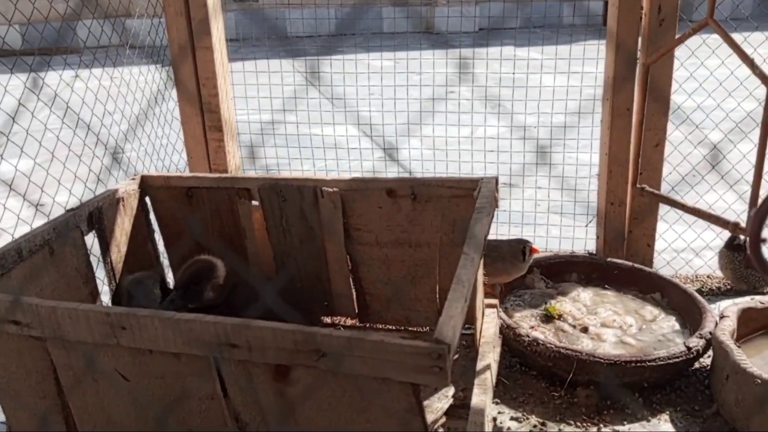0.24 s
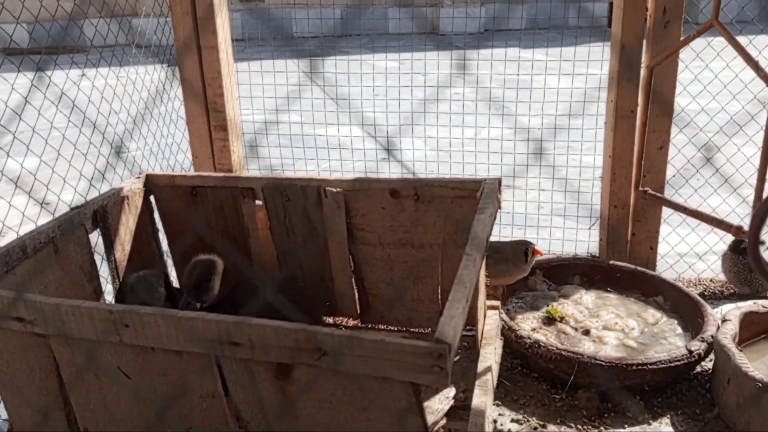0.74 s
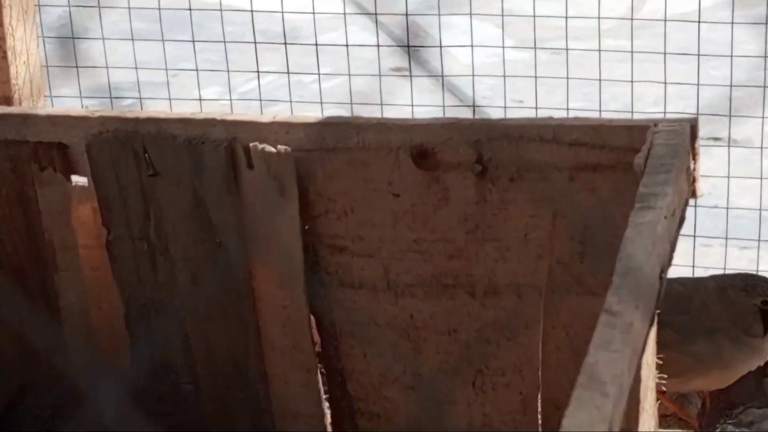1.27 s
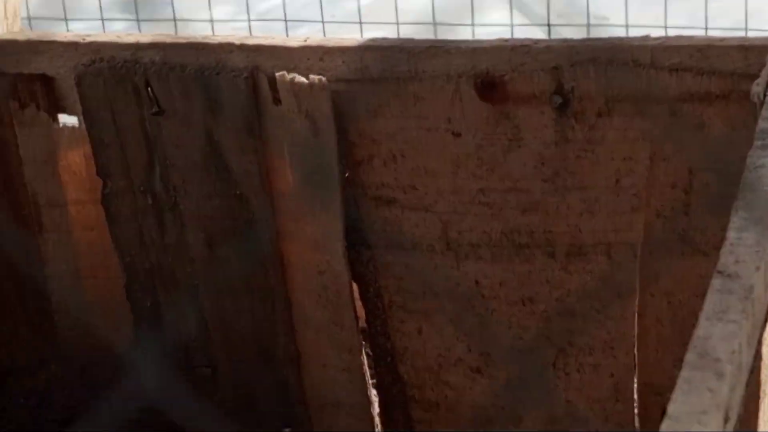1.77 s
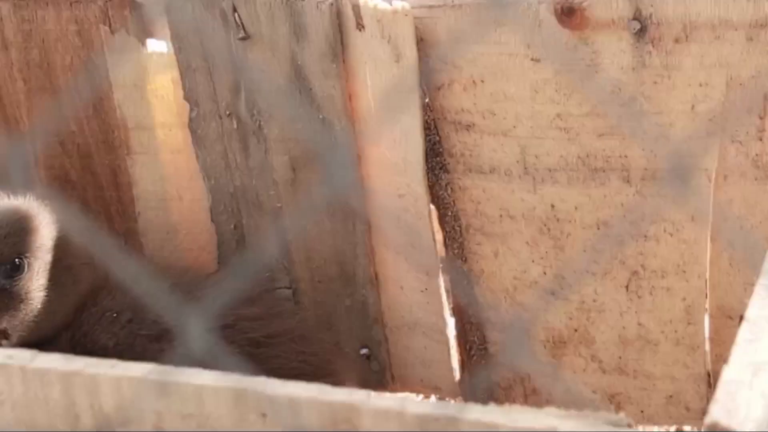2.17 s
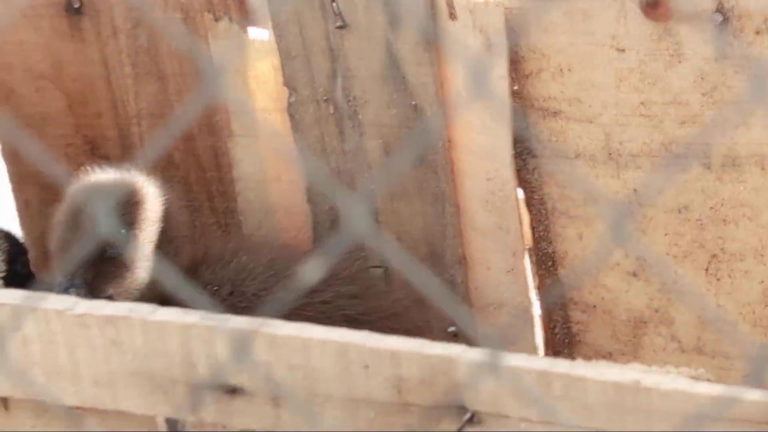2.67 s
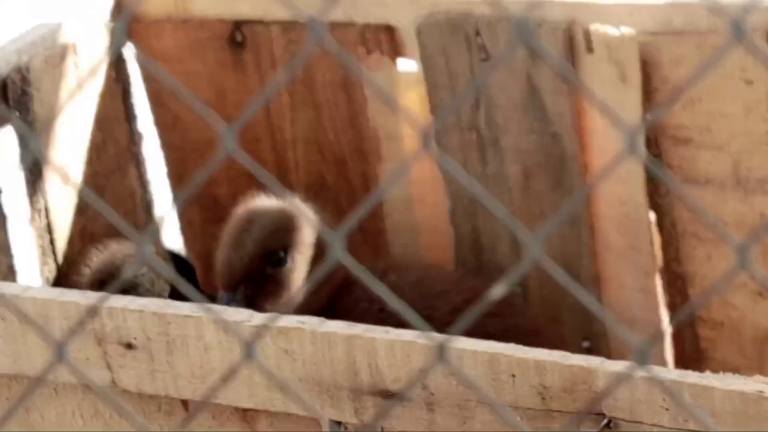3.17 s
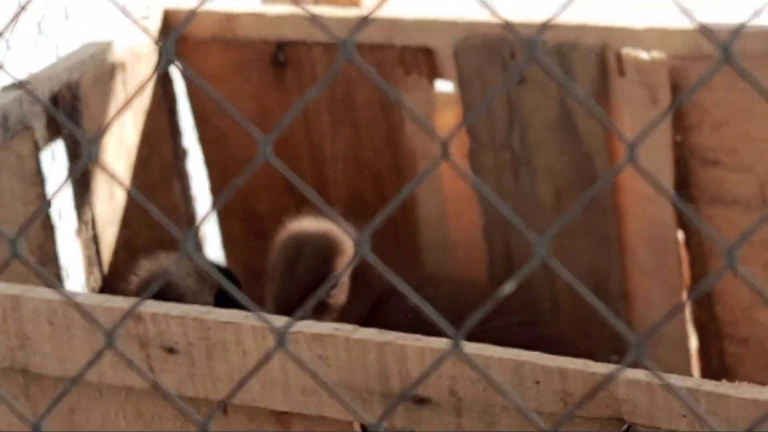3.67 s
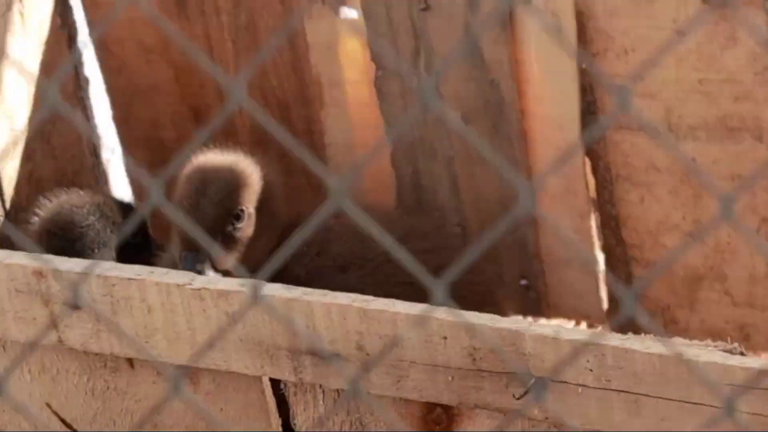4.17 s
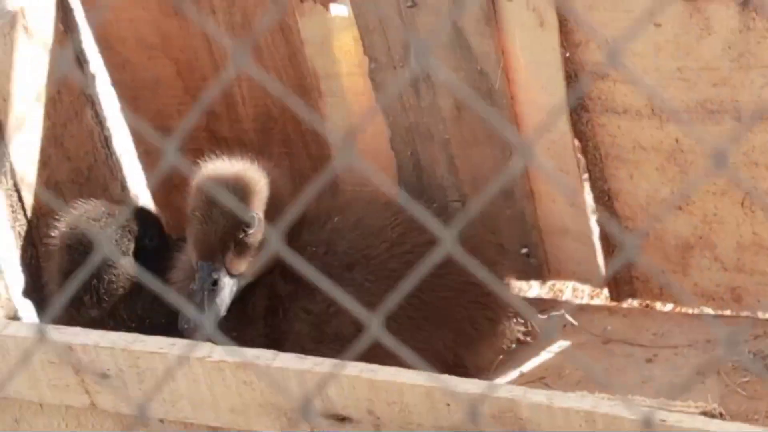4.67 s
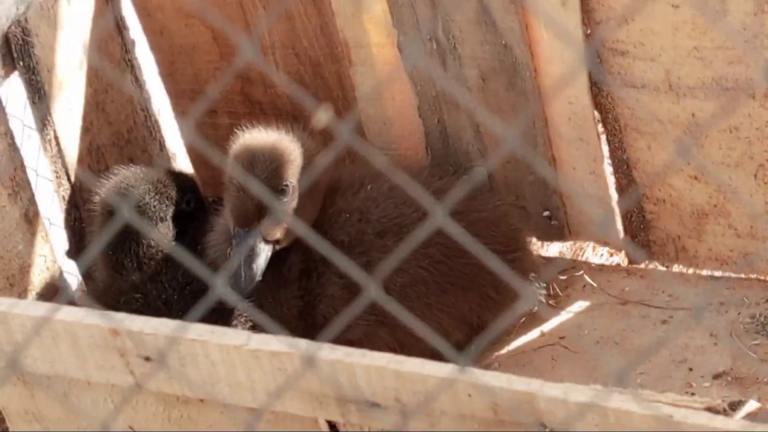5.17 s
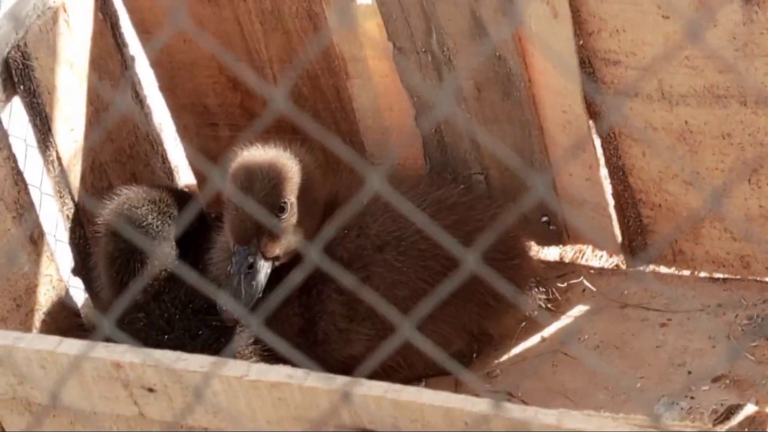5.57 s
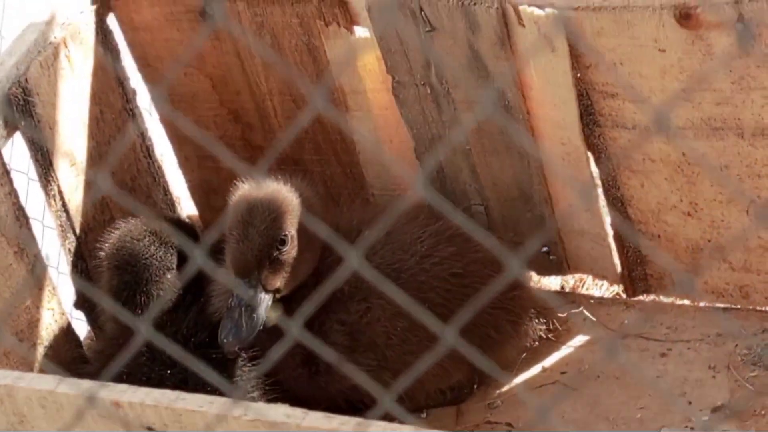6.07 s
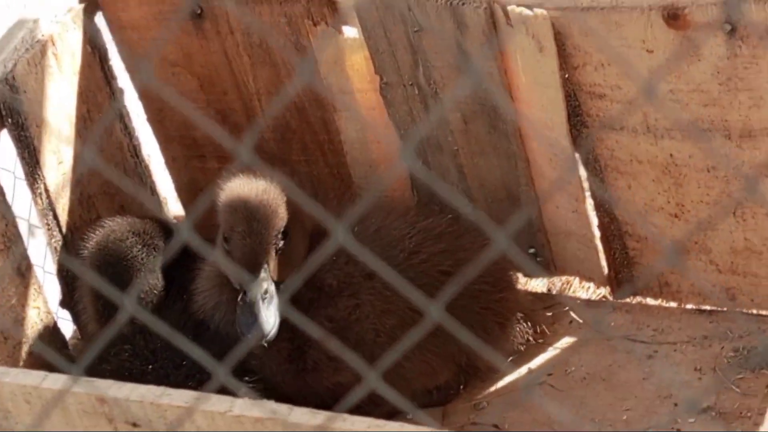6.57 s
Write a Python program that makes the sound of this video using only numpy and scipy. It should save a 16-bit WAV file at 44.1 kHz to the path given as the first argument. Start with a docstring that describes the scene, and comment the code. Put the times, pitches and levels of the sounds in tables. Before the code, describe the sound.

Outdoors by a boarded poultry pen, a close hen gives short, mostly falling clucks two or three times a second. Small birds chirp thinly with reverberation, and ducklings peep in pairs. Litter rustles and wire rattles; a distant rooster crows in two phrases from about two to three seconds, as the handheld microphone gets bumped.

```python
"""Poultry in a wooden pen

A hen close by gives short clucks that mostly fall in pitch; ducklings whistle thin, arching peeps.
Small birds chirp, a finch buzzes once and a rooster crows far off. Voices are sine tones and shaped noise.
Knocks burst and ring in boards and wire; litter rustles as many tiny ringing contacts.
The microphone rumbles when bumped. Air noise, echoes and reverberation lie around it all."""
import sys
import numpy as np
from scipy import signal
from scipy.fft import rfft, irfft
from scipy.io import wavfile

SR = 44100
rng = np.random.default_rng(int(sys.argv[2]) if len(sys.argv) > 2 else 0)


def transcribe(signal):
    """Save signal, clipped to [-1, 1], as a 16-bit WAV file at the path in sys.argv[1]."""
    frames = np.atleast_2d(signal).T
    limited = np.clip(frames, -1, 1)
    pcm = np.round(limited * 32767).astype(np.int16)
    wavfile.write(sys.argv[1], SR, pcm)


N = 300762  # length in samples
TIME = np.arange(N) / SR


def from_db(db):
    """Turn decibels into a plain multiplier."""
    return 10 ** (np.asarray(db) / 20)


def rms_one(x):
    """Scale x to an average (rms) strength of 1."""
    return x / np.sqrt(np.mean(x ** 2) + 1e-20)


def in_time(rows):
    """Each column of a curve at every sample; the first column is time in seconds."""
    s, *columns = np.transpose(rows)
    return [np.interp(TIME, s, c) for c in columns]


def gain_at(points, hz):
    """Gain of a spectrum at these frequencies."""
    f, db = np.transpose(points)
    return from_db(np.interp(np.log(hz + 1), np.log(f), db))


def colour(x, spectrum):
    """Give x a spectrum that falls away beyond its ends; rms 1."""
    hz = np.arange(len(x) // 2 + 1) * SR / len(x) + 1
    low_skirt = np.minimum(1, hz / spectrum[0][0]) ** 2
    high_skirt = np.minimum(1, spectrum[-1][0] / hz) ** 2
    return rms_one(irfft(rfft(x) * gain_at(spectrum, hz) * low_skirt * high_skirt, len(x)))


def drift(rate, size):
    """Random wobble around zero: `rate` new values a second, joined by straight lines."""
    at = np.arange(size) * rate / SR
    count = int(at[-1]) + 2
    return np.interp(at, np.arange(count), rng.standard_normal(count))


def add(out, s, x):
    """Mix x into out from time s, in seconds."""
    i = round(s * SR)
    x, i = x[max(-i, 0):], max(i, 0)
    out[i:i + len(x)] += x[:max(N - i, 0)]


def phase_of(hz):
    """Add up a changing pitch into the phase of its wave."""
    return 2 * np.pi * np.cumsum(hz) / SR


def reedy(hz, throat, count):
    """Harmonics of a pitch, each weighted by the throat's resonances; rms 1."""
    phase = phase_of(hz)
    return rms_one(sum(gain_at(throat, k * hz) * np.sin(k * phase) for k in range(1, count + 1)))


def stroke(s, length, attack_s, fall_db_per_s):
    """Envelope of one contact: a rise up to time s, a hold, a steady fall."""
    rise = np.clip(1 + (TIME - s) / attack_s, 0, 1) ** 2
    return rise * from_db(-np.clip(fall_db_per_s * (TIME - s - length), 0, 200))


def grains(low_hz, high_hz, per_s, ring_s, spread_db, count):
    """Tiny contacts of uneven size, each ringing briefly at one of `count` pitches; rms 1."""
    out, r = np.zeros(N), from_db(-60 / (ring_s * SR))  # r: strength kept from sample to sample
    born = rng.random(N) < per_s * from_db(4 * drift(70, N)) / SR
    sizes = from_db(spread_db * np.minimum(rng.exponential(1, N), 3))
    clicks = born * sizes * rng.choice([-1, 1], N)
    dealt = rng.integers(0, count, N)  # which pitch each contact gets
    for k, hz in enumerate(np.geomspace(low_hz, high_hz, count)):
        w = 2 * np.pi * hz / SR
        resonator = [1, -2 * r * np.cos(w), r * r]
        out += signal.lfilter([1, 0, -1], resonator, clicks * (dealt == k) + 1e-18)
    return rms_one(out)


def outdoor_air(level_db=-56.5):
    """A faint, steady bed of coloured noise."""
    # Spectrum of the air noise. Each row: frequency in Hz, gain in dB.
    air_spectrum = [(40, -18), (90, 14.5), (200, 4), (450, 3), (900, -24.5), (1800, 4.5), (4000, -12),
                    (6800, -20.5), (11000, -28), (15000, -14.5)]
    return from_db(level_db) * colour(rng.standard_normal(N), air_spectrum)


def handling(level_db=-3.5, attack_s=0.018, fall_db_per_s=202.5, grip_db=-59.5):
    """The microphone's body rumbles with each bump, and faintly throughout from the hand's grip."""
    # Bumps on the microphone. Each row: time of full force in seconds, hold in seconds,
    # rumble in dB before the overall level.
    bumps = [(2.38, 0.17, -25.5), (2.6, 0.055, -37), (2.907, 0.055, -46), (3.76, .1, -45),
             (4.107, 0.028, -41.5), (4.35, 0.021, -40.5), (4.897, 0.028, -36)]
    # Spectrum of the rumble. Each row: frequency in Hz, gain in dB.
    rumble = [(25, -15.5), (45, -15.5), (62, -7.5), (76, 1.5), (95, -7.5), (113, 0.5), (160, -6.5),
              (300, -17)]
    force = from_db(grip_db)
    for s, length, db in bumps:
        force = force + from_db(db) * stroke(s, length, attack_s, fall_db_per_s)
    return from_db(level_db) * force * colour(rng.standard_normal(N), rumble)


def rustling(scuff_db=1, rattle_db=-1.5, rub_db=-5, attack_s=0.011, fall_db_per_s=338.5):
    """Litter scuffs dully while seed and wire rattle brightly, over a soft rubbing noise."""
    # The birds' constant stirring between scratches. Each row: time in seconds, relative level in dB.
    stir = [(0, -43.5), (1.1, -51), (1.7, -44.5), (3.1, -45.5), (4.3, -51), (6.8, -52.5)]
    # Scratches in the litter, which also shake seed and wire. Each row: time of full force in seconds,
    # hold in seconds, relative dull scuffing in dB, relative bright rattle in dB.
    scratches = [ (0, 0.039, -29, -31), (0.121, 0.0088, -37, -46), (0.237, 0.054, -38, -51),
                 (0.527, .012, -40, -31), (0.546, 0.039, -24.5, -28), (0.647, 0.036, -29.5, -40.5),
                 (0.863, 0.037, -40, -50), (1.462, 0.063, -41, -36.5), (1.513, .05, -30, -42.5),
                 (1.576, 0.056, -23.5, -42.5), (1.657, 0.056, -27, -39.5), (1.973, 0.021, -44, -33),
                 (2.332, 0.058, -38, -44), (2.394, .21, -26.5, -32), (2.615, 0.083, -31.5, -35.5),
                 (2.8, 0.092, -39, -37.5), (2.909, 0.062, -33, -30.5), (3.281, 0.042, -34, -38),
                 (3.468, .045, -42.5, -46), (3.571, 0.022, -33.5, -45), (3.777, 0.013, -43, -47.5),
                 (3.882, 0.014, -45, -40), (3.977, 0.013, -40.5, -24.5), (4.037, 0.0048, -53, -32.5),
                 (4.62, 0.005, -41, -39.5), (4.856, 0.058, -35.5, -43), (4.984, 0.0039, -43.5, -40),
                 (5.089, 0.0059, -51, -30), (5.212, 0.013, -51, -42), (6.029, 0.038, -44, -45),
                 (6.403, 0.012, -59, -43.5), (6.679, 0.012, -53, -51)]
    # Spectrum of the dull scuffing. Each row: frequency in Hz, gain in dB.
    scuff = [(250, -8.5), (350, -11.5), (700, -6), (1300, 0), (2200, 1), (3200, 3), (4800, -1.5),
             (6500, -39.5)]
    # Spectrum of the bright rattle. Each row: frequency in Hz, gain in dB.
    rattle = [(2000, -28), (3200, -5.5), (4600, -6), (5800, 3.5), (7500, -3.5), (9500, -11), (13000, -30.5),
              (15500, -9.5)]
    dull = from_db(in_time(stir)[0] + 3 * drift(16, N))  # the stirring flickers
    bright = dull * from_db(-8.5)
    for s, length, dull_db, bright_db in scratches:
        push = stroke(s, length, attack_s, fall_db_per_s)
        dull = np.maximum(dull, from_db(dull_db) * push)
        bright = np.maximum(bright, from_db(bright_db) * push)
    rub = from_db(rub_db) * rng.standard_normal(N)
    litter = grains(280.4, 5500, per_s=3500, ring_s=0.061, spread_db=7.3, count=44) + rub
    seed = grains(2600, 15500, per_s=2400, ring_s=0.028, spread_db=4.8, count=48) + rub
    scuffing = from_db(scuff_db) * dull * colour(litter, scuff)
    rattling = from_db(rattle_db) * bright * colour(seed, rattle)
    return scuffing + rattling


def rooster():
    """A hoarse crow in two phrases: harmonics through a throat, each phrase rising then sagging in pitch."""
    # The crow over time. Each row: time in seconds, pitch in Hz, relative level in dB,
    # hoarseness as a share of the pitch.
    crow = [(1.62, 413.3, -43.5, 0.011), (1.95, 506, -30.5, 0.015), (2.17, 475.4, -29, 0.044),
            (2.3, 438.3, -39.5, 0.05), (2.37, 434.4, -55, 0.024), (2.55, 463.4, -32, 0.015),
            (2.8, 466.3, -34.5, 0.013), (3.23, 399.6, -41, 0.019), (3.3, 396, -66, 0.051)]
    # Resonances of the throat. Each row: frequency in Hz, gain in dB.
    crow_throat = [(400, -25), (900, -1), (1180, -30.5), (1390, -1), (1500, -13.5), (1650, 12), (1950, 1),
                   (2300, -24.5), (2900, -22), (3300, -7.5), (4500, -80)]
    hz, level_db, hoarse = in_time(crow)
    sounding = (TIME > crow[0][0]) & (TIME < crow[-1][0])
    loudness = sounding * from_db(level_db + 4.2 * drift(25.07, N))
    return loudness * reedy(hz * (1 + hoarse * drift(350, N)), crow_throat, count=8)


def small_birds(trill=0.042, trill_rate=450, scoop=0.1, scoop_s=.012, low_voice=0.87, low_voice_db=-6):
    """Shivering slurs flick up, then mostly fall; two sides of the syrinx (voice box) differ in pitch."""
    # Chirps. Each row: start in seconds, length in seconds, pitch in Hz that the opening upward flick
    # aims for, end pitch in Hz, relative level in dB.
    slurs = [ (.005, 0.16, 4870, 3690, -34), (0.084, 0.1, 5170, 3630, -31), (0.777, 0.075, 5020, 3630, -39),
             (1.385, 0.058, 5080, 4220, -38.5), (1.538, 0.055, 3195, 2430, -26),
             (1.871, 0.13, 5210, 2596, -26.5), (3.184, 0.13, 5520, 4210, -32),
             (3.459, 0.068, 4120, 2946, -34), (3.675, 0.13, 5335, 3433, -31.5),
             (4.434, 0.048, 5560, 4800, -22), (4.475, 0.098, 4694, 3415, -28.5),
             (4.901, 0.17, 5590, 3830, -30), (5.066, 0.05, 3520, 2704, -32.5),
             (5.261, 0.11, 5420, 3630, -32), (5.777, 0.077, 5480, 3810, -34),
             (6.353, 0.039, 4880, 4890, -35), (6.448, 0.088, 3760, 2534, -39.5),
             (6.476, 0.061, 4740, 4530, -38.5)]
    out = np.zeros(N)
    for s, length, aim_hz, end_hz, level_db in slurs:
        size = int(length * SR)
        flick = 1 - scoop * np.exp(-np.arange(size) / SR / scoop_s)
        hz = np.linspace(aim_hz, end_hz, size) * flick
        for ratio, side_db in [(1, 0), (low_voice, low_voice_db)]:
            voice = np.sin(phase_of(ratio * hz * (1 + trill * drift(trill_rate, size))))
            loudness = from_db(level_db + side_db + 3.9 * drift(150, size))
            add(out, s, loudness * signal.windows.tukey(size, .4) * voice)
    return out


def finch(arch=0.058):
    """A short, nasal, buzzy note: many harmonics through a throat, with pitch and loudness arching."""
    # Notes. Each row: start in seconds, length in seconds, top pitch in Hz, relative level in dB.
    notes = [(4.871, 0.058, 573, -26.5)]
    # Resonances of the throat. Each row: frequency in Hz, gain in dB.
    finch_throat = [(500, -52), (1700, -4.5), (2400, -3.5), (3600, 8), (4600, -1.5), (7000, -4.5),
                    (9000, -58)]
    out = np.zeros(N)
    for s, length, hz, level_db in notes:
        bow = np.sin(np.linspace(0, np.pi, int(length * SR)))
        note = reedy(hz * (1 + arch * (bow - 1)), finch_throat, count=14)
        add(out, s, from_db(level_db) * bow * note)
    return out


def ducklings(waver=0.016, flutter_db=4, sag_db=5.5, octave_db=-30):
    """Thin, nearly pure whistles that arch up and weaken as they come down again."""
    # Peeps. Each row: time of the top in seconds, length in seconds, lowest pitch in Hz,
    # top pitch in Hz, relative level in dB.
    whistles = [ (0.384, 0.11, 2147, 3990, -31.5), (0.497, 0.12, 2114, 3830, -28.5),
                (3.231, 0.084, 2200, 3710, -37.5), (3.353, .110, 1935, 3900, -38),
                (5.873, 0.078, 1776, 2253, -36.5), (6.631, 0.082, 1920, 3070, -37.5),
                (6.736, 0.08, 1900, 3186, -35)]
    # Resonances of the throat. Each row: frequency in Hz, gain in dB.
    peep_throat = [(1700, -37), (2100, 3), (2450, 10.5), (2750, -2), (3100, 7), (3500, 1.5), (3900, 11),
                   (4600, -20)]
    out = np.zeros(N)
    for s, length, foot_hz, top_hz, level_db in whistles:
        u = np.linspace(-1, 1, int(length * SR))
        hz = foot_hz + (top_hz - foot_hz) * np.cos(np.pi * u / 2) ** 2
        hz = hz * (1 + waver * drift(400, len(u)))
        loudness = from_db(level_db - sag_db * u + flutter_db * drift(120, len(u)))
        loudness = loudness * signal.windows.tukey(len(u), .14)
        phase = phase_of(hz)
        tone = gain_at(peep_throat, hz) * np.sin(phase) + from_db(octave_db) * np.sin(2 * phase)
        add(out, s - length / 2, loudness * tone)
    return out


def knocks(crack_s=0.0053, thud_s=0.0064, body_db=-4, wire_db=-9):
    """Each knock cracks in the frame, thuds in the boards and sets the wires ringing."""
    # Sharp knocks on the pen. Each row: start in seconds, overall level in dB, then the relative
    # levels in dB of the crack, the wire ring and the wooden thud.
    hits = [(0.1331, 0.5, -2.5, -5, -16), (1.4693, -9, -17, -30, 0), (1.6527, 7.5, -23, 1, -19.5),
            (2.385, -1.5, 0, -55, -24), (2.4182, -0.5, -3.5, -28, -36), (2.5177, -3, -6.5, -0.5, -24),
            (2.9533, -6.5, -15, 2, -16), (2.976, -20, -16, -2, -25), (2.998, -7.5, -19, -3.5, -19)]
    # Spectrum of the crack in the frame. Each row: frequency in Hz, gain in dB.
    frame = [(300, -17.5), (800, 4.5), (1300, -14), (2200, -2.5), (3100, 8), (4500, -4.5), (6000, -5),
             (9500, -22), (13000, -39), (16000, -43)]
    # Spectrum of the thud in the boards. Each row: frequency in Hz, gain in dB.
    board = [(200, -39.5), (380, 2.5), (620, 1), (900, 6.5), (1800, -13.5), (3000, -16)]
    # Notes of the wire mesh. Each row: frequency in Hz, relative level in dB,
    # time to fade by 60 dB in seconds.
    wires = [(3570, -23, .07), (4700, -6.5, 0.073), (5694, -18.5, 0.037), (5905, 22, 0.029),
             (6450, 6.5, 0.083), (7180, 1.5, .06), (8440, -3, 0.11), (9400, -12.5, .08)]
    out, t = np.zeros(N), np.arange(SR // 5) / SR
    for s, peak_db, crack_db, ring_db, thud_db in hits:
        crack = colour(rng.standard_normal(len(t)), frame) * np.exp(-t / crack_s)
        thud = colour(rng.standard_normal(len(t)), board) * np.exp(-t / thud_s)
        ring = np.zeros(len(t))
        for hz, db, t60 in wires:
            # every knock excites each wire note a little differently
            ring += from_db(db - 60 * t / t60 + rng.normal(0, 4)) * np.sin(2 * np.pi * hz * t)
        body = from_db(crack_db + body_db) * crack + from_db(thud_db + body_db) * thud
        wire_ring = from_db(ring_db + wire_db) * ring / np.abs(ring).max()
        add(out, s, from_db(peak_db) * (body + wire_ring))
    return out


def hen(break_s=0.0027, second_db=-17, third_db=-34, jitter=0.051, attack_s=0.0028, release_s=0.005,
        lead_s=0.011, gulp_at_s=0.0086, gulp_s=0.0074, gulp_db=-7.5):
    """A faint lead-in, a push of air whose pitch breaks, usually down, and a gulp as the throat shuts.

    Returns the direct sound and what goes out into the pen, a share that falls steadily
    as the microphone moves into the box."""
    # Clucks. Each row: time of the pitch break in seconds, pitch before in Hz, pitch after in Hz,
    # level in dB, swell before the break in seconds, fade after it in seconds,
    # relative rasp in dB, relative lead-in in dB, gulp pitch in Hz.
    calls = [ (.001, 480, 437, -14.5, 0.0038, 0.013, -11, -14.5, 340),
             (0.338, 560, 394, -4.5, 0.0012, 0.011, -9.5, -21, 340),
             (0.612, 900, 701, -4, 0.0023, .012, -11.5, -19, 482),
             (0.904, 470, 396, -10.5, 0.0013, 0.017, -25.5, -29, 330),
             (1.034, 420.5, 436, -3, .001, 0.0072, -26, -35, 370),
             (1.321, 660, 595, -10.5, 0.01, 0.012, -14.5, -31, 517),
             (1.534, 700, 625, -4.5, 0.006, 0.015, -12.5, -10.5, 325),
             (1.784, 1170, 649, -9.5, 0.0041, 0.017, -7.5, -12.5, 344),
             (2.098, 490, 421, -11, 0.005, 0.011, -14, -31, 404),
             (2.402, 620, 444, -10.5, 0.00068, 0.018, -6, -44, 405),
             (3.314, 680, 470, -12, 0.0095, 0.016, -12, -24, 406),
             (3.573, 1100, 700, -4, 0.0027, 0.0099, -14.5, -23.5, 593),
             (3.911, 1020, 520.4, -8, 0.011, .017, -10.5, -31.5, 445),
             (4.169, 1000, 513, -5.5, 0.0078, 0.018, -15.5, -12, 537),
             (4.505, 764, 583, -12.5, 0.004, 0.018, -6, -34.5, 377.6),
             (4.855, 960, 563, -2.5, 0.01, 0.0013, -23.5, -50.5, 552),
             (5.263, 850, 577, -6, 0.011, 0.014, -25.5, -40.5, 558),
             (5.532, 990, 611, -6, .007, 0.022, -20.5, -10.5, 548),
             (6.043, 763, 530, -15.5, 0.0087, 0.0062, -10.5, -19, 407)]
    # Share of a cluck sent out into the pen. Each row: time in seconds, gain in dB.
    outward_share = [(0, 3.5), (6.8, -6)]
    # resonances of the throat: (Hz, dB)
    throat = [(150, -31.5), (330, 3.0), (550, 9), (1200, 4), (1600, -8.5), (2200, -5), (3200, -22.5),
              (5000, -15), (8000, -42)]
    direct, outward = np.zeros(N), np.zeros(N)
    t = np.arange(-SR // 20, SR // 10) / SR  # seconds from the pitch break
    for s, before_hz, after_hz, level_db, swell, fade, rasp_db, lead_db, gulp_hz in calls:
        hz = after_hz + (before_hz - after_hz) * (1 - np.tanh(t / break_s)) / 2
        phase = phase_of(hz * (1 + jitter * drift(461.7, len(t))))
        opening = (1 + np.tanh((t + swell) / attack_s)) / 2
        closing = (1 - np.tanh((t - fade) / release_s)) / 2
        lead = from_db(lead_db) * np.exp(-((t + swell + lead_s / 2) / lead_s) ** 2)
        tone = sum(from_db(db) * np.sin(k * phase) for k, db in enumerate([0, second_db, third_db], 1))
        # the rasp is breath noise that pulses with the voice
        rasp = colour(rng.standard_normal(len(t)) * (1 + .8 * np.sin(phase)), throat)
        gulp_shape = np.exp(-((t - gulp_at_s) / gulp_s) ** 2)
        gulp = from_db(gulp_db) * gulp_shape * np.sin(2 * np.pi * gulp_hz * t)
        voice = (opening * closing + lead) * (tone + from_db(rasp_db) * rasp)
        cluck = from_db(level_db) * (voice + gulp)
        add(direct, s + t[0], cluck)
        add(outward, s + t[0], from_db(np.interp(s, *np.transpose(outward_share))) * cluck)
    return direct, outward


def pen(x, t60, top_hz):
    """Diffuse reflections from boards and walls: x, dulled above top_hz, smeared by fading noise."""
    t = np.arange(SR) / SR
    tail = rng.standard_normal(SR) * from_db(-60 * t / t60) * (1 - np.exp(-(t / 0.0079) ** 2))
    dull = signal.sosfilt(signal.butter(1, top_hz, fs=SR, output="sos"), x + 1e-18)
    return signal.fftconvolve(dull, tail / np.linalg.norm(tail))[:N]


def hollow(x, t60=.36):
    """The boarded space keeps a few low notes ringing after each cluck."""
    # Hollow ring of the wooden pen. Each row: frequency in Hz, gain in dB.
    notes = [(406, -3), (450, -0.5), (516, 1.5), (580, 3.5), (640, 0), (760, -20), (976, -12.5)]
    out, r = np.zeros(N), from_db(-60 / (t60 * SR))
    for hz, level_db in notes:
        w = 2 * np.pi * hz / SR
        unit_peak = (1 - r * r) / 2 * np.array([1, 0, -1])
        out += from_db(level_db) * signal.lfilter(unit_peak, [1, -2 * r * np.cos(w), r * r], x + 1e-18)
    return out


def scene(wall_s=0.04, wall_db=-11):
    """Near sounds are mostly direct; far birds are strongly reflected; a wall repeats the high calls."""
    # Echoes from nearby boards. Each row: delay in seconds, gain in dB.
    board_echoes = [(0.0163, -14.5), (.029, -17.5)]
    clucks, outward = hen()
    peeps, chirps = ducklings(), small_birds()
    near = peeps + finch() + knocks()
    far_birds = chirps + rooster()
    boards = sum(from_db(db) * np.interp(TIME - delay, TIME, outward + near, left=0)
                 for delay, db in board_echoes)
    wall = from_db(wall_db) * np.interp(TIME - wall_s, TIME, peeps + chirps, left=0)
    cluck_tail = hollow(outward) + from_db(-9.5) * pen(outward, .36, 1100)
    near_tail = from_db(-13.5) * pen(near, 0.32, 8000)
    far = from_db(-1.5) * far_birds + from_db(-1) * pen(far_birds, 0.33, 6700)
    voices = clucks + near + boards + wall + cluck_tail + near_tail + far
    return (voices + rustling() + handling() + outdoor_air())[None]


def record(dry, stop_hz=16800):
    """The loudest peaks overload and flatten; from stop_hz up, the sound is cut by at least 60 dB."""
    return signal.sosfilt(signal.cheby2(14, 60, stop_hz, fs=SR, output="sos"), np.clip(dry, -1, 1))


dry = scene()
out = record(dry)
transcribe(out)
```